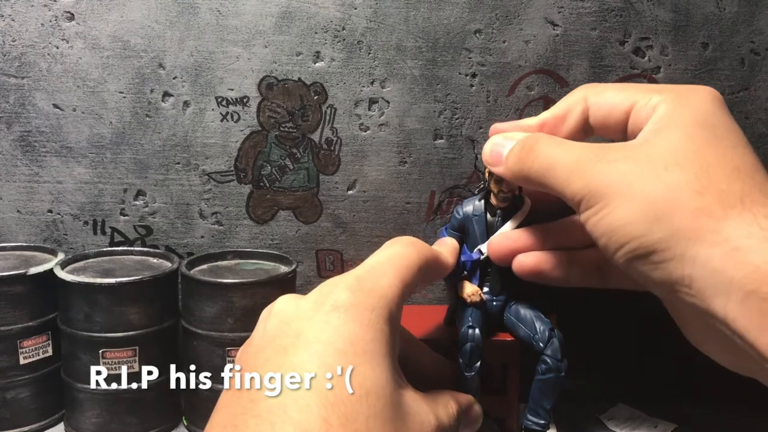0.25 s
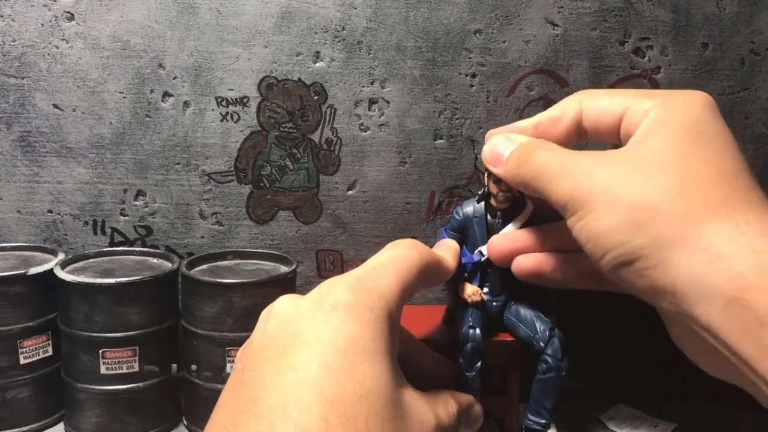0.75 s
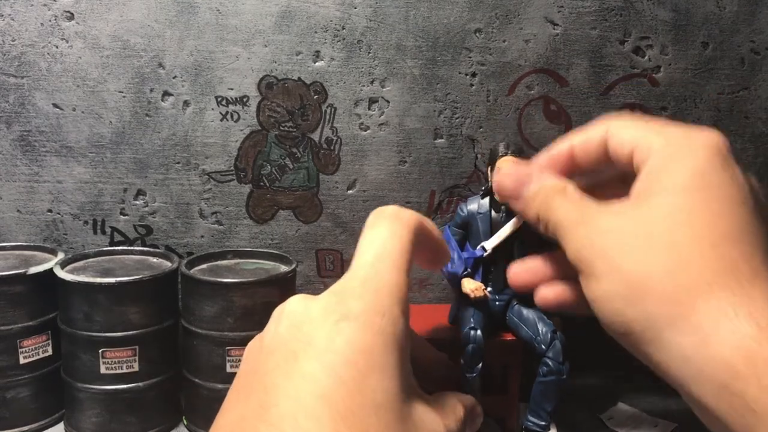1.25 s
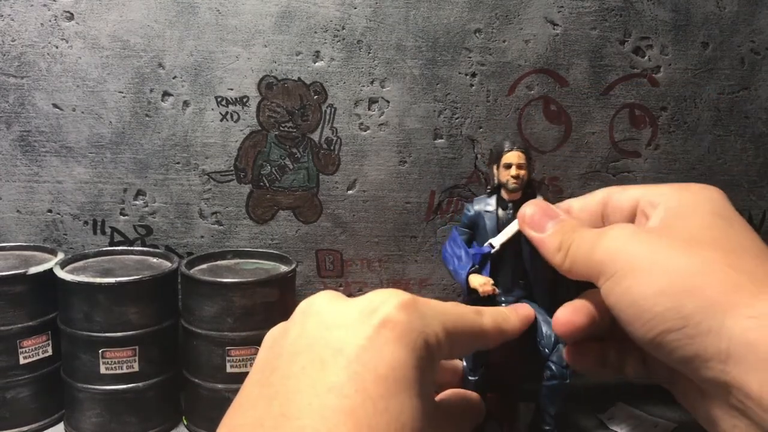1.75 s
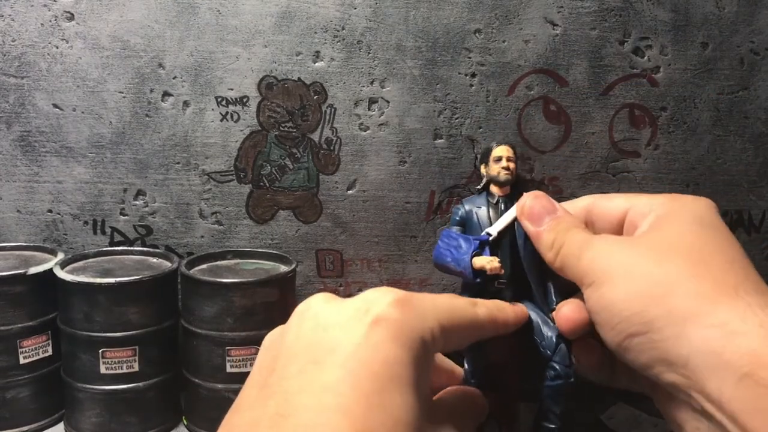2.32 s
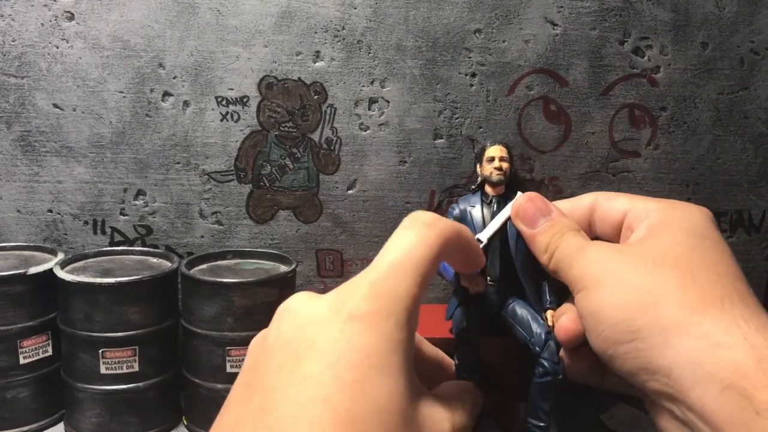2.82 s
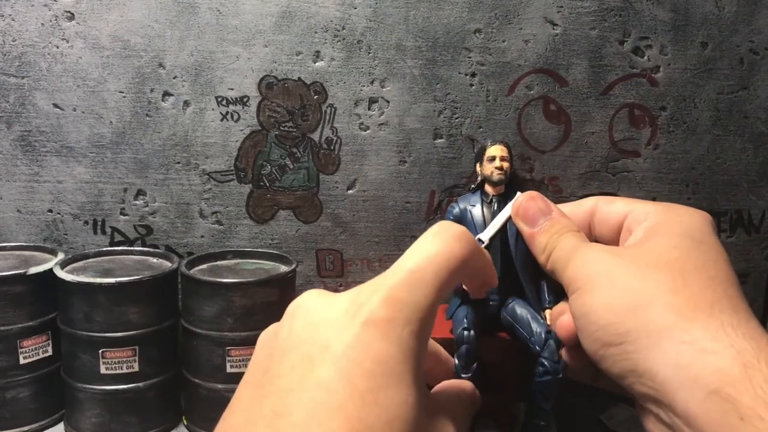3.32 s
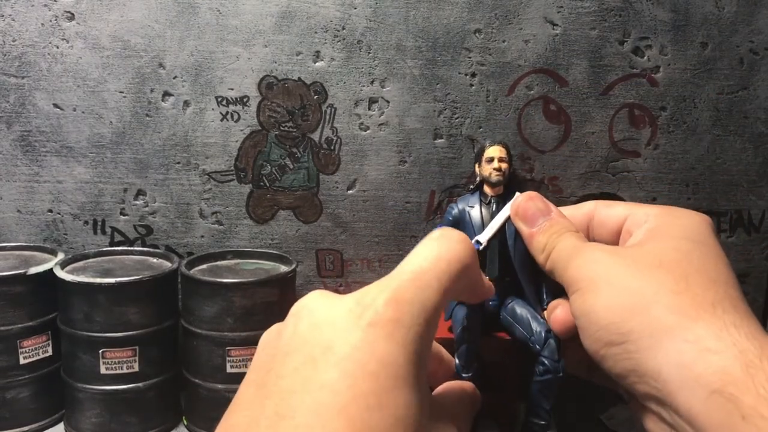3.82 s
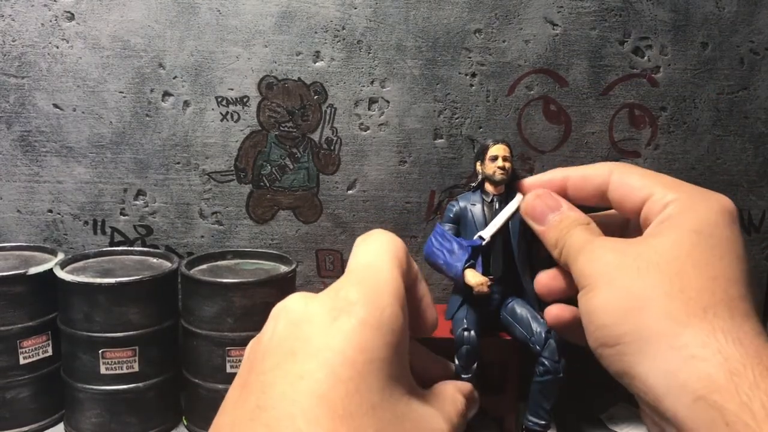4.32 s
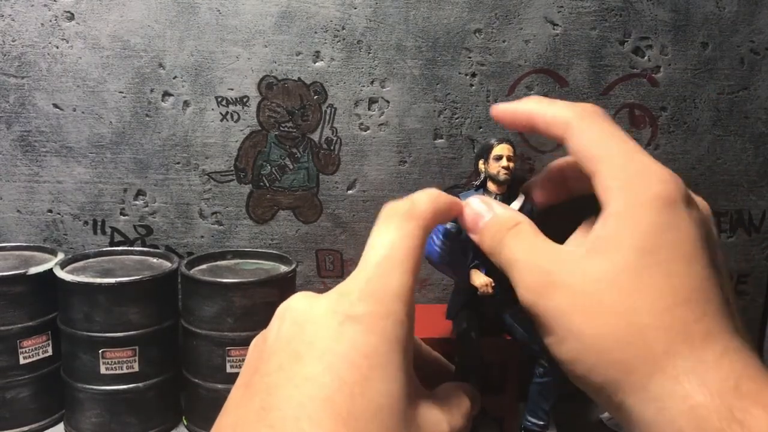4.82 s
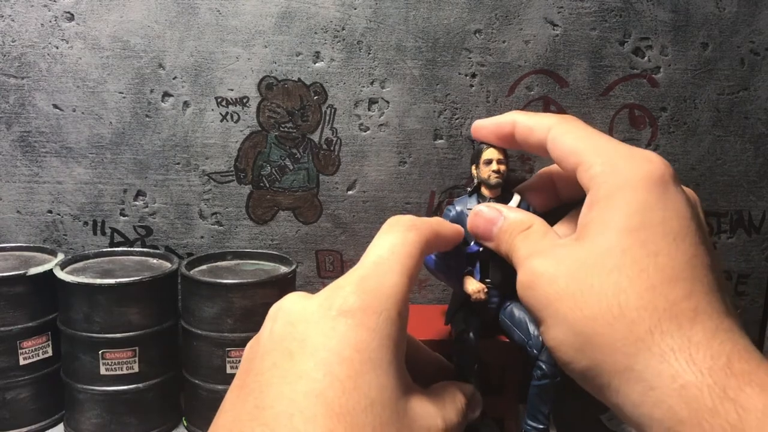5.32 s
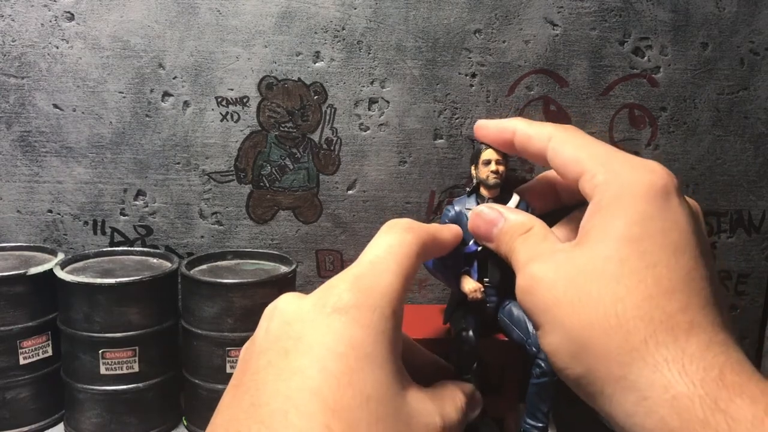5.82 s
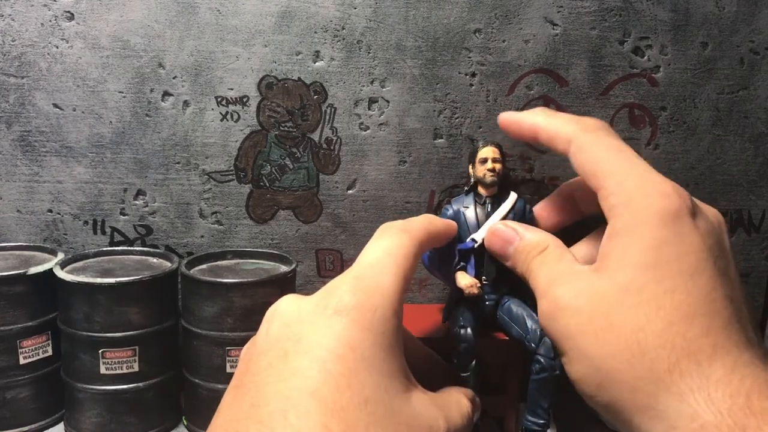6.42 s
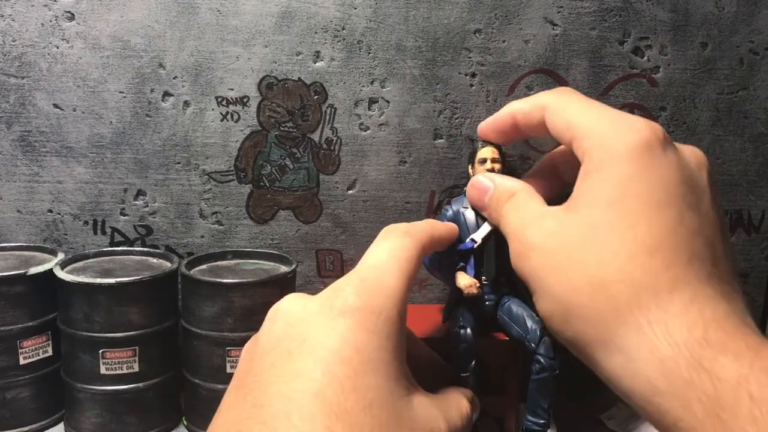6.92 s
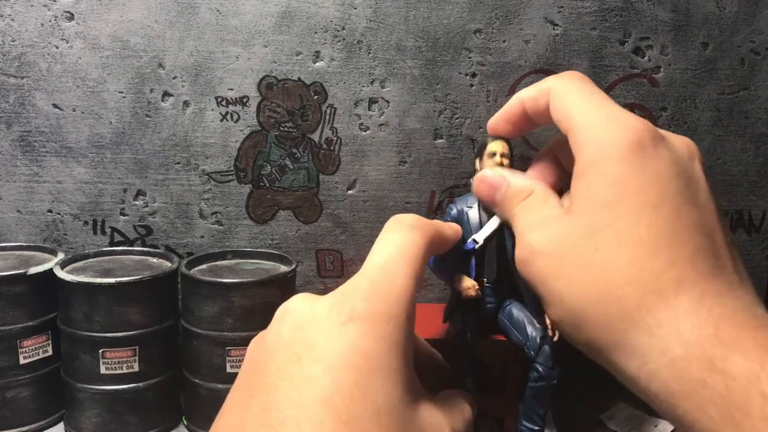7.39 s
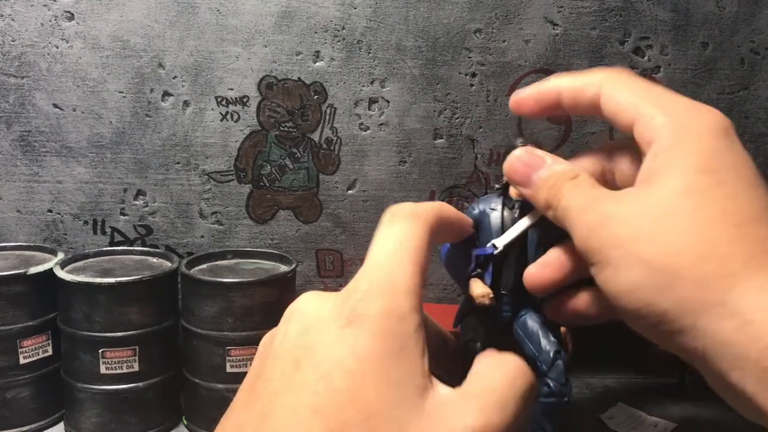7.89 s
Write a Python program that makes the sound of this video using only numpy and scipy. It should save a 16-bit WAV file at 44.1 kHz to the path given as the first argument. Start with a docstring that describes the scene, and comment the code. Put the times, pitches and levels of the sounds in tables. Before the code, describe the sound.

In a quiet small room, fingers pose a jointed plastic figure close to the microphone. Irregular dry clicks and faint friction come first, then a bright snap just before two seconds is the loudest click. Small ticks, soft rubs and muffled tabletop bumps continue sparsely. Near seven seconds a very soft low tone rises, then firmer hollow knocks land with a brief faint joint squeak.

```python
"""Hands pose a small plastic figure on a hollow tabletop, close up in a quiet room that hums and hisses faintly.
Joints and stiff parts click from the start, as cracks of noise through the plastic's resonances; knocks and
pushes soon join in and ring the tabletop's low modes, and fingers rub in strokes of rough friction noise.
The loudest clicks come just before 2 s. Near 7 s a soft sine climbs and swells; then the strongest knocks
fall, with a joint squeaking as a narrow ring of friction noise among them."""
import sys
import numpy as np
from scipy import signal
from scipy.fft import rfft, irfft, next_fast_len
from scipy.io import wavfile

SR = 44100
rng = np.random.default_rng(int(sys.argv[2]) if len(sys.argv) > 2 else 0)


def generate_wav(signal):
    """Clip the signal to [-1, 1] and save it as 16-bit WAV at the path in sys.argv[1]."""
    frames = np.transpose(np.atleast_2d(signal))
    scaled = np.clip(frames, -1, 1) * 32767
    pcm = np.round(scaled).astype(np.int16)
    wavfile.write(sys.argv[1], SR, pcm)


N = 359394

# resonances of the plastic figure: pitch_hz, width_hz, level_db (level for clicks only)
PLASTIC_RESONANCES = [(1465, 140, 7.5), (2500, 430, 1.5), (3584, 1700, 9.5), (4510, 270, -8.5),
                      (5360, 400, -8)]


def from_db(db):
    """Gain of a level in dB."""
    return 10 ** (np.asarray(db) / 20)


def rms_one(x):
    """Scale to rms 1."""
    return x / np.sqrt(np.mean(x ** 2) + 1e-20)


def band(x, low_hz, high_hz):
    """Butterworth band-pass."""
    sos = signal.butter(3, [low_hz, high_hz], "band", fs=SR, output="sos")
    return signal.sosfilt(sos, x + 1e-18)


def coloured(x, spectrum):
    """Shape a noise by a spectrum of (Hz, dB) points joined over log frequency; rms 1."""
    size = next_fast_len(N)
    hz, db = np.transpose(spectrum)
    log_hz = np.log(np.arange(size // 2 + 1) * SR / size + 1)
    gain = from_db(np.interp(log_hz, np.log(hz), db))
    return rms_one(irfft(rfft(x, size) * gain, size)[:N])


def resonance(x, hz, width_hz):
    """Two-pole resonance with a gain of about 1 on top."""
    r = np.exp(-np.pi * width_hz / SR)
    zeros = np.array([1, 0, -1]) * (1 - r * r) / 2
    poles = [1, -2 * r * np.cos(2 * np.pi * hz / SR), r * r]
    return signal.lfilter(zeros, poles, x + 1e-18)


def ring(force, hz, t60_s):
    """A unit impulse sets a sine of height 1 ringing, 60 dB down after t60_s."""
    r, w = from_db(-60 / (t60_s * SR)), 2 * np.pi * hz / SR
    return signal.lfilter([0, np.sin(w)], [1, -2 * r * np.cos(w), r * r], force + 1e-18)


def drift(rate_hz):
    """Slow random wander of rms 1: white noise through two equal low-pass poles."""
    r = np.exp(-2 * np.pi * rate_hz / SR)
    noise = rng.standard_normal(N + SR)
    return rms_one(signal.lfilter([1], [1, -2 * r, r * r], noise)[SR:])   # drop the filter's start


def grains(per_s, spread_db):
    """Impulses at random times, of uneven size and either sign; rms 1."""
    sizes = from_db(spread_db * np.minimum(rng.exponential(1, N), 4)) * rng.choice([-1, 1], N)
    return rms_one(sizes * (rng.random(N) < per_s / SR))


def clicks():
    """Each click is a short crack of noise that excites the plastic's resonances, a ring and a bright top."""
    # plastic clicks: start_s, level_db, brightness_db (treble up, low mids down), ring_hz
    click_table = [(0.2252, -45, 5, 6860), (0.437, -47, -3, 5000), (0.5082, -33.5, 3, 3800),
                   (0.5113, -32.5, -6, 3770), (0.8716, -58, 3, 3240), (0.892, -38.5, -8.5, 1970),
                   (0.947, -45, -4, 2840), (0.984, -46, -6.5, 3310), (1.0815, -47, 1, 3540),
                   (1.0994, -35, 1, 4730), (1.131, -47, 6, 4530), (1.376, -47.5, -10, 5200),
                   (1.5015, -45.5, -2.5, 5200), (1.6565, -30, -5.5, 2230), (1.856, -25, -5.5, 1550),
                   (1.8683, -39.5, -10, 4740), (1.9592, -48.5, 8.5, 6730), (1.9661, -30, -3.5, 1550),
                   (1.9785, -21.5, -2, 4800), (1.9822, -14.5, 12.5, 4420), (1.986, -14.5, 1.5, 4930),
                   (1.994, -35, -13, 1484), (2.301, -43.5, -11, 3000), (2.5129, -38.5, 1.5, 7230),
                   (2.679, -47.5, -1, 6700), (2.757, -46, -0.5, 4970), (2.782, -42, 3.5, 4440),
                   (2.8748, -34.5, 2.5, 4300), (3.02, -43, -10.5, 5300), (3.059, -47, -0.5, 6500),
                   (3.1763, -42.5, -4.5, 4100), (3.2082, -51, -2, 4540), (3.399, -53.5, -8.5, 4060),
                   (3.515, -47.5, -0.5, 6860), (3.5977, -33.5, -6.5, 1540), (4.0172, -43, -2.5, 4200),
                   (4.042, -37, -4, 4900), (4.168, -43.5, -4, 1360), (4.2926, -55.5, -5, 4000),
                   (4.3896, -49, 1, 4100), (4.8404, -49.5, -2, 3770), (4.9495, -31, -3.5, 5000),
                   (5.069, -46, 2.5, 7300), (5.113, -45, 0, 4050), (5.175, -55, 12, 7320),
                   (5.2582, -29.5, 2.5, 3800), (5.444, -48, -6, 3700), (5.6046, -54.5, -8.5, 3500),
                   (5.667, -41.5, 0.5, 6720), (5.899, -47.5, -9, 2270), (5.957, -41, 3.5, 3730),
                   (6.056, -45.5, -0.5, 6850), (6.235, -47, -5, 1580), (6.4166, -40.5, -8.5, 1480),
                   (6.959, -40, 2, 7140), (7.168, -58.5, -18, 1480), (7.2572, -34, 2, 6400),
                   (7.475, -43, -3, 3880), (7.564, -35.5, -5.5, 1460), (7.8188, -37.5, -3, 4750),
                   (8.028, -31.5, -4, 5000)]
    low_db, high_db = 2.5, 2   # low and high parts of an average click, before brightness
    rise_s, snap_s, rattle_s, rattle_db = 0.0008, 0.0017, 0.007, -15.5   # time constants, rattle level
    damping_s = 0.065   # extra decay of the upper parts
    ring_cycles, ring_db = 9.1, 10.5   # pitch over width, level above the click

    t = np.arange(SR // 16) / SR
    snap = np.exp(-t / snap_s) + from_db(rattle_db) * np.exp(-t / rattle_s)
    shape = (1 - np.exp(-t / rise_s)) * snap
    cracks = rng.standard_normal((len(click_table), len(t))) * shape
    energy = np.sum(cracks ** 2, axis=1, keepdims=True)
    cracks *= np.sqrt(np.sum(shape ** 2) / energy)   # equal energy
    damping = np.exp(-np.outer([0, 1, 2], t) / damping_s)   # the higher parts stop sooner

    parts = np.zeros((4, N + len(t)))   # low, middle, high, ring
    for crack, (start_s, level_db, bright_db, ring_hz) in zip(cracks, click_table):
        at = round(start_s * SR)
        parts_db = level_db + np.array([[low_db - bright_db], [0], [high_db + bright_db]])
        damped = crack * damping
        parts[:3, at:at + len(t)] += from_db(parts_db) * damped
        ringing = resonance(damped[1], ring_hz, ring_hz / ring_cycles)
        parts[3, at:at + len(t)] += from_db(level_db + ring_db) * ringing

    # tiny ticks come at random
    ticks = from_db(-73) * grains(9, spread_db=3)
    smear = rng.standard_normal(len(t)) * shape
    smear /= np.sqrt(np.sum(smear ** 2))
    low, middle, high = parts[:3, :N] + signal.fftconvolve(ticks, smear)[:N]

    # every click meets the plastic at another spot and favours other resonances
    latest = np.searchsorted(np.array(click_table)[1:, 0], np.arange(N) / SR)
    favour = from_db(rng.normal(0, 2, (len(click_table), len(PLASTIC_RESONANCES))))
    body = np.zeros(N)
    for k, (hz, width_hz, db) in enumerate(PLASTIC_RESONANCES):
        drive = favour[latest, k] * (low if hz < 3000 else middle)
        body += from_db(db) * resonance(drive, hz, width_hz) * (-1) ** k   # alternate polarity

    broad = from_db(2.5) * band(low, 502, 2300) + band(middle, 3280, 8600)
    bright_top = from_db(4.5) * band(high, 8000, 22000)
    return body + broad + bright_top + parts[3, :N]


def strokes():
    """Gains of rub, bright rub and tabletop push: each stroke of the fingers grips, holds and lets go."""
    # finger strokes: start_s, length_s, rub_db, bright_db (relative to rub), push_db (before patter gain)
    stroke_table = [(0.933, 0.056, -60, -15, -55), (1.24, 0.14, -52, -5, -57), (1.28, 0.041, -53, 6, -64),
                    (1.598, 0.25, -59.5, -13, -54.5), (1.94, 0.67, -57, -7, -48),
                    (2.741, 0.1, -62, -10, -47.5), (2.928, 0.22, -64, -11, -58),
                    (3.729, 0.073, -58, -24, -39.5), (3.957, 0.099, -63.5, -8, -45),
                    (4.023, 0.13, -52.5, -10, -46), (4.336, 0.17, -59.5, -13, -51.5),
                    (4.506, 0.052, -52.5, -12, -60.5), (4.547, 0.24, -60, -3, -61),
                    (4.742, 0.17, -63, -1, -73), (4.925, 0.23, -61, -3, -56), (5.154, 0.2, -59, -8, -49),
                    (5.896, 0.13, -55, -10, -53), (6.004, 0.31, -59, -2.5, -57.5),
                    (6.686, 0.078, -67.5, 4, -55.5), (6.945, 0.084, -57.5, -13.5, -59),
                    (7.182, 0.2, -62, -15, -71), (7.428, 0.16, -63, -5, -53.5),
                    (7.603, 0.11, -51.5, -5.5, -49), (7.69, 0.21, -53, -11.5, -53.5),
                    (7.855, 0.14, -55, -7.5, -47.5), (8.004, 0.079, -50, -10, -63),
                    (8.075, 0.12, -61.5, -4, -52)]
    grip, let_go = 0.12, 0.41   # shares of a stroke spent rising and dying
    gains, t = np.zeros((3, N)), np.arange(N) / SR
    for start_s, length_s, rub_db, bright_db, push_db in stroke_table:
        way = (t - start_s) / length_s
        hold = np.clip(way / grip, 0, 1) * np.clip((1 - way) / let_go, 0, 1)
        shape = np.sin(np.pi / 2 * hold) ** 2
        gains += from_db([[rub_db], [rub_db + bright_db], [push_db]]) * shape
    return gains


def tabletop(push):
    """Knocks and a patter of small pushes ring the same modes; soft contact dulls each group's highs."""
    # knocks: start_s, force_db, hardness_db (upper modes up, deep modes down)
    knock_table = [(0.5127, -32, -4.5), (0.893, -48.5, -2), (1.249, -38.5, -2), (1.288, -45, -11),
                   (1.66, -32.5, 3), (1.866, -42, -1), (1.979, -37, -5), (2.136, -48.5, -8),
                   (2.187, -51, 22), (2.227, -47, 19), (2.273, -46, 15), (2.295, -45, 19), (2.31, -46, 23),
                   (2.433, -42, 14), (2.456, -37.5, -1), (2.607, -44.5, -1), (2.878, -38, 6.5),
                   (3.058, -46.5, 7), (3.178, -31, 9), (3.518, -53, 21), (3.6, -39, 5), (3.718, -45.5, 2),
                   (3.782, -49.5, 16), (3.894, -48, 7.5), (4.952, -41, 17), (5.076, -47.5, 3),
                   (6.138, -38, -1), (6.249, -45, 1), (6.32, -56.5, 20.5), (6.409, -44.5, 19),
                   (6.654, -53, 17), (6.892, -44.5, 13), (6.945, -50.5, 15.5), (6.994, -49.5, 16.5),
                   (7.057, -52.5, 19.5), (7.2, -42.5, 2), (7.255, -37, 2), (7.275, -45.5, -7.5),
                   (7.615, -29.5, -2.5), (7.632, -21.5, 7.5), (7.734, -41, -4), (7.767, -41, -4),
                   (7.812, -41, -4), (7.862, -26.5, 1.5), (7.893, -48, 6), (8.027, -27, 14.5),
                   (8.045, -28, 10)]
    # tabletop modes in three groups: pitch_hz, level_db, t60_s
    deep_modes = [(100, 3.5, 0.054), (141.7, -2.5, 0.16), (174.2, -3.5, 0.21)]
    # pitch_hz, level_db, t60_s
    middle_modes = [(214.5, -5, 0.11), (261.4, 1.5, 0.081), (320.6, 6, 0.058), (441, -12.5, 0.07)]
    # pitch_hz, level_db, t60_s
    upper_modes = [(570, -10.5, 0.0685), (641.6, -1, 0.062), (676, -2.5, 0.057)]
    deep_db, upper_db, upper_follows = 2.5, -10, 0.75   # average knock; share of the hardness
    tap_db, tap_s = -7, 0.0044   # dry fingertip tap: level, decay time constant

    start_s, force_db, hard_db = np.transpose(knock_table)
    at = np.round(start_s * SR).astype(int)
    pressure = (push + from_db(-61.5)) * from_db(-31 + 4.9 * drift(12.7))   # faint between strokes too
    patter = pressure * grains(400, spread_db=3)

    # modes, knock dB, upper band edge Hz, patter dB
    groups = [(deep_modes, deep_db - hard_db, 400, 0.1),
              (middle_modes, 0, 520, -0.1),
              (upper_modes, upper_db + upper_follows * hard_db, 950, -5)]
    out = np.zeros(N)
    for modes, part_db, contact_hz, patter_db in groups:
        spread_db = rng.normal(0, 2.5, (len(at), len(modes)))   # every knock favours other modes
        rings = np.zeros(N)
        for k, (hz, level_db, t60_s) in enumerate(modes):
            force = from_db(patter_db) * patter
            force[at] += from_db(force_db + part_db + spread_db[:, k])
            rings += from_db(level_db) * ring(force, hz, t60_s)
        out += band(rings, 0.98 * modes[0][0], contact_hz)   # a plate radiates little below its modes

    # a dry tap of the fingertip on top of each knock and push
    taps = np.abs(patter)
    taps[at] += from_db(force_db + upper_follows * hard_db)
    envelope = signal.lfilter([1], [1, -np.exp(-1 / (tap_s * SR))], taps)
    puffs = envelope * rng.standard_normal(N)
    return out + from_db(tap_db) * band(puffs, 700, 1945)


def rubbing(rub, bright):
    """Skin slides over plastic and tape: dense slips on smooth friction noise, ringing the plastic in streaks."""
    # friction spectrum: pitch_hz, level_db (per Hz)
    rub_spectrum = [(500, -20), (900, -3.5), (2000, -7.5), (4500, -9), (11000, -16.5)]
    ring_db, ring_cycles, ring_sway_db = 4, 32, 4.5   # level, pitch over width, wander of each streak
    slips = grains(2000, spread_db=4) * from_db(3 * drift(30))
    friction = slips + 1.7 * rng.standard_normal(N)
    flutter = from_db(3.4 * drift(18))
    grit = coloured(friction, rub_spectrum)
    streaks = np.zeros(N)
    for hz, *_ in PLASTIC_RESONANCES:
        sway = from_db(ring_db + ring_sway_db * drift(4.2))
        streaks += sway * resonance(grit, hz, hz / ring_cycles)
    airy = band(friction, 4700, 17300)
    airy += from_db(3 * drift(8)) * resonance(friction, 14400, 2500)
    return flutter * (rub * rms_one(grit + streaks) + bright * rms_one(airy))


def squeak():
    """A joint squeaks as it turns: friction noise ringing one narrow resonance, swelling late."""
    start_s, length_s, level_db, hz = 7.67, 0.17, -52.5, 1397
    t, white = np.arange(N) / SR, rng.standard_normal(N)
    way = np.clip((t - start_s) / length_s, 0, 1)
    narrow = resonance(resonance(white, hz, hz / 30), hz, hz / 30)
    return from_db(level_db) * np.sin(np.pi * way ** 2) * rms_one(narrow)


def low_tone():
    """A soft sine that climbs steadily, swells to its peak, eases and stops."""
    start_s, peak_s, end_s, peak_db = 6.72, 7.03, 7.19, -46
    start_hz, rise_hz_per_s, swell_db_per_s = 113.6, 37, 47
    t = np.arange(N) / SR
    hz = start_hz + rise_hz_per_s * (t - start_s)
    fade = np.clip((t - start_s) / 0.05, 0, 1) * np.clip((end_s - t) / 0.016, 0, 1)
    level_db = peak_db - swell_db_per_s * np.abs(t - peak_s)
    sine = np.sin(2 * np.pi * np.cumsum(hz) / SR)
    return np.sqrt(2) * fade * from_db(level_db) * sine


def room(x):
    """A diffuse tail: decaying noise that starts after 3 ms."""
    t60_s = 0.2
    t = np.arange(SR // 2) / SR
    tail = rng.standard_normal(len(t)) * from_db(-60 * t / t60_s) * (t > 0.003)
    return signal.fftconvolve(x, tail / np.sqrt(np.sum(tail ** 2)))[:N]


def room_tone():
    """Steady air noise, a narrow rumble and a faint steady hum."""
    # spectrum of the air noise: pitch_hz, level_db (per Hz)
    air_spectrum = [(15, -41), (25, -6.5), (59, 1.5), (141, 5.5), (284, -4), (352, -5), (437, -13),
                    (7830, -28.5), (14200, -28), (15800, -34.5)]
    air_db = -56
    rumble_hz, rumble_width_hz, rumble_db = 50, 9.5, -57.5
    hum_hz, hum_db = 363.5, -67
    air = from_db(air_db) * coloured(rng.standard_normal(N), air_spectrum)
    narrow = resonance(rng.standard_normal(N), rumble_hz, rumble_width_hz)
    narrow = resonance(narrow, rumble_hz, rumble_width_hz)
    rumble = from_db(rumble_db) * rms_one(narrow)
    hum = np.sqrt(2) * from_db(hum_db) * np.sin(2 * np.pi * hum_hz * np.arange(N) / SR)
    return air + rumble + hum


def scene():
    """All sources in one channel; the handling sounds also feed the room tail."""
    rub, bright, push = strokes()
    near = clicks() + tabletop(push) + rubbing(rub, bright) + squeak()
    tail = from_db(-9.5) * room(near)
    return (near + tail + low_tone() + room_tone())[None]


def record(dry):
    """The microphone dips in the treble, peaks clip at full scale and a steep low-pass cuts the top."""
    dip_hz, dip_width_hz, dip_depth = 10500, 900, 0.4   # depth is the share taken away
    cutoff_hz = 16100   # 60 dB down from here up
    dipped = dry - dip_depth * resonance(dry, dip_hz, dip_width_hz)
    low_pass = signal.cheby2(22, 60, cutoff_hz, fs=SR, output="sos")
    return signal.sosfilt(low_pass, np.clip(dipped, -1, 1))


dry = scene()
out = record(dry)
generate_wav(out)
```